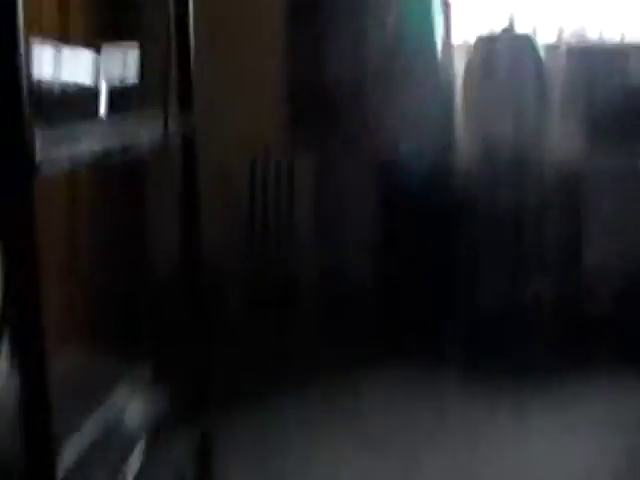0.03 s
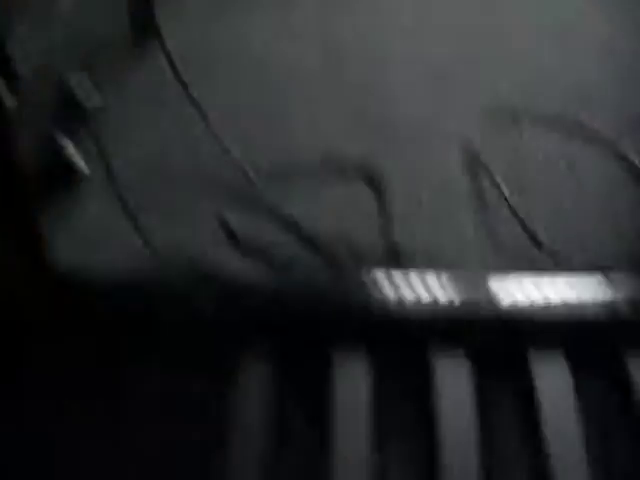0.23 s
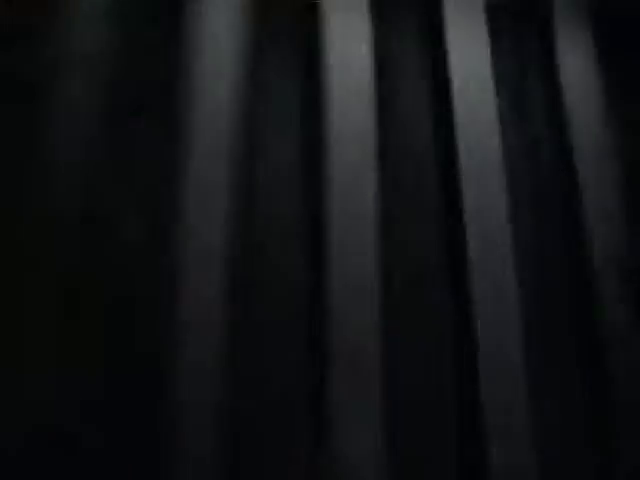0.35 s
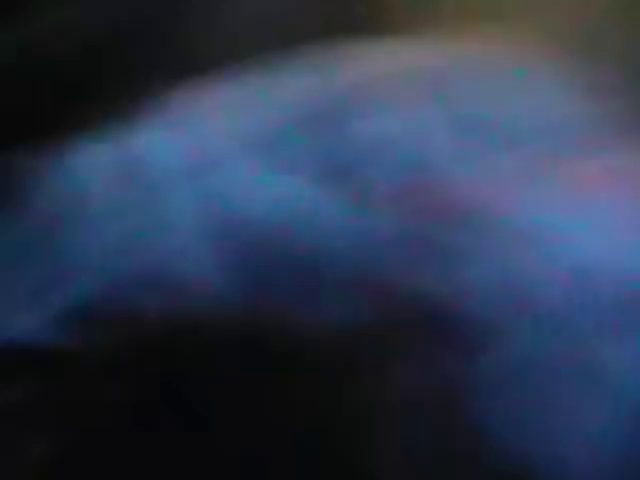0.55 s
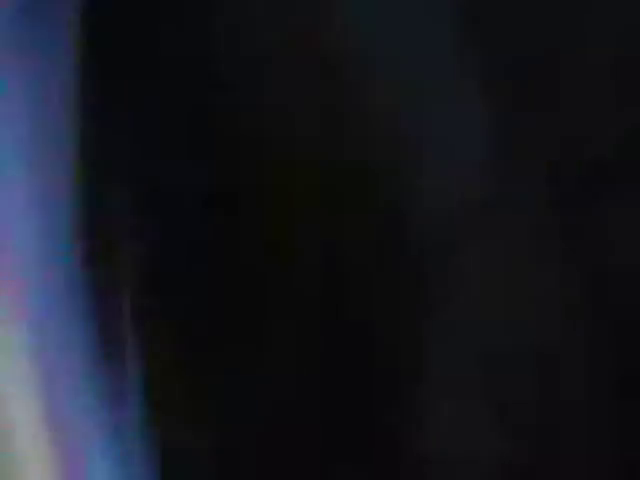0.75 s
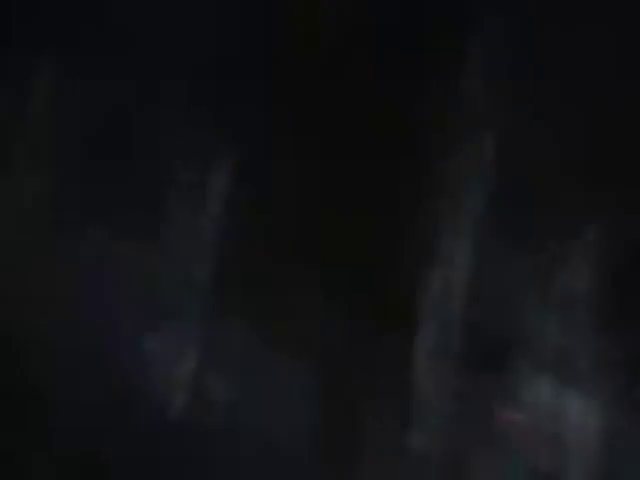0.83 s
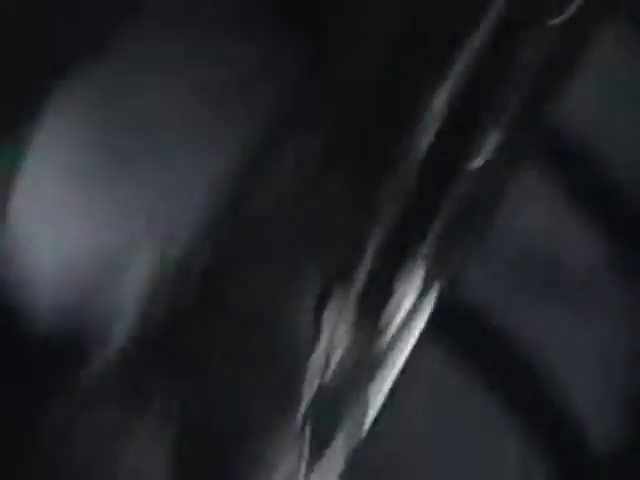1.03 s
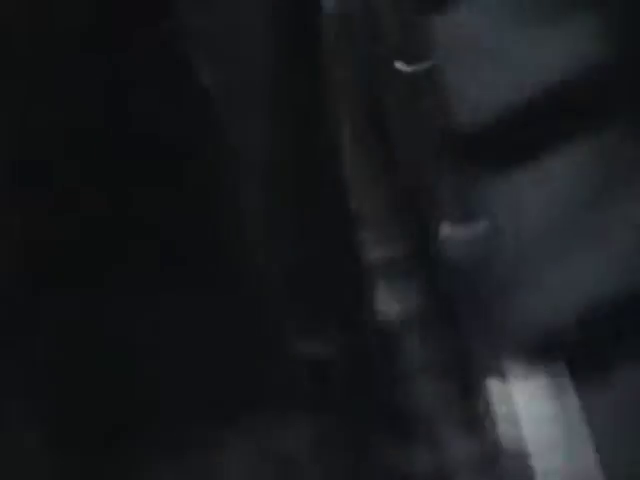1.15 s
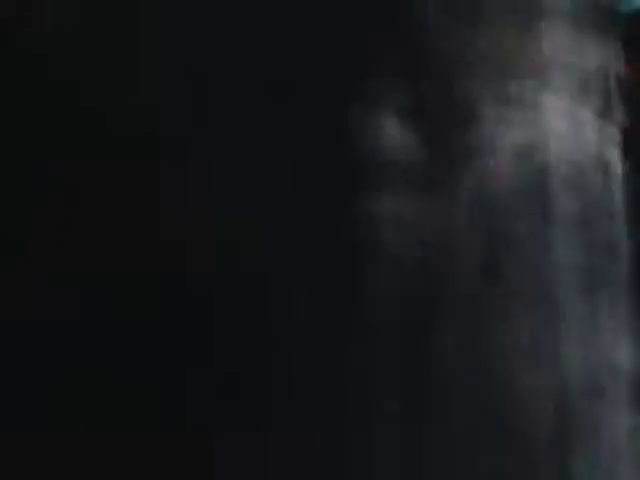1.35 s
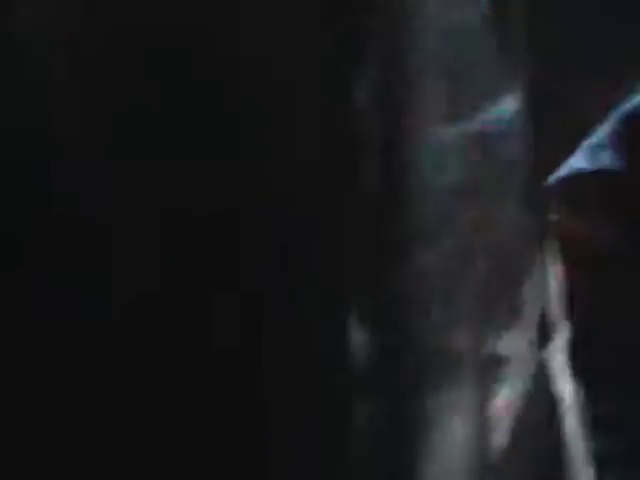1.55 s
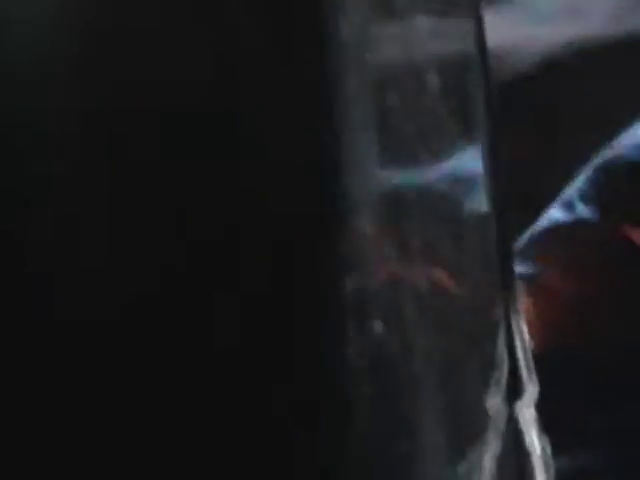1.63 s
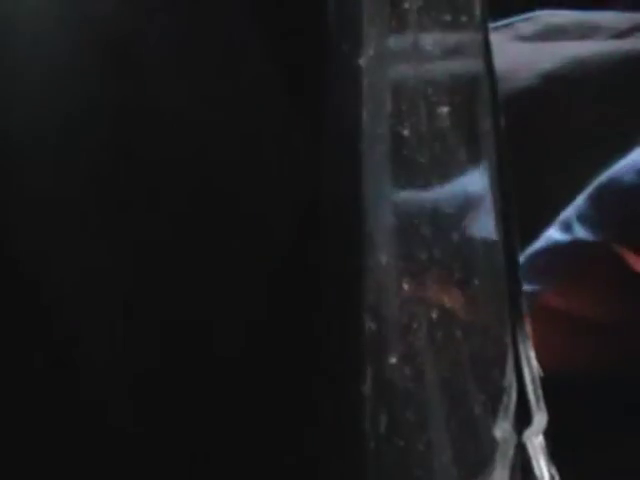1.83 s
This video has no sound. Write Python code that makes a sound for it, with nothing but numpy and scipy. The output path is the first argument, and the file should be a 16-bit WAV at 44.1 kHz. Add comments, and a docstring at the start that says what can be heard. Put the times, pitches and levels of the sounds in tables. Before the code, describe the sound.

A small camera tumbles down with sharp plastic knocks, hollow thumps and scrapes.

```python
"""A small camera slides off its perch, catches an edge, drops and tumbles over things in a quiet room.
Its own two microphones hear it through the casing: each knock is a crack, a hollow clack and a low
thump, with scrapes and one rising rasp in between. The hardest blows overload the input.
Once the camera has reached the floor, the room answers with a short echo."""
import sys
import numpy as np
from scipy import signal
from scipy.fft import rfft, irfft
from scipy.io import wavfile

SR = 44100
rng = np.random.default_rng(int(sys.argv[2]) if len(sys.argv) > 2 else 0)


def transcribe(u):
    """Save the signal u as a 16-bit wav file named by the first command-line argument.

    u: samples, shape (n,) or (channels, n), limited to [-1, 1]; the rate is SR.
    q: integer samples, one column per channel.
    """
    v = np.clip(np.atleast_2d(u).T, -1, 1)
    q = np.round(v * 32767).astype(np.int16)
    wavfile.write(sys.argv[1], SR, q)


N = 83790
T = np.arange(N) / SR
HIT_T = T[:8192]  # seconds since a hit began


def knocks():
    """Every blow and tap of the tumble; some hit hard objects that answer with a dry note."""
    # blows (time [s], crack [dB], clack [dB], thump [dB], thump pitch [Hz], chatter fade time [ms])
    blows = [(0.2346, -42, -14, -7.5, 130.6, 2.7), (0.367, -52, -11, -8, 164, 3),
             (0.384, -13.5, 0.5, -4, 135, 3.1), (0.4146, -19, 1, -0.5, 124, 3.6),
             (0.435, -7, -3.5, -15, 127, 5.9), (0.5277, 6.5, 9.5, 3, 149, 3.3),
             (0.533, 1.5, 1.5, 7.5, 240, 11), (.546, -4, 3, 5, 165, 0.63), (0.551, 12, 3, 4.5, 226, 1.27),
             (0.5571, -1, 8, 5.5, 240, 2.1), (0.5779, -8.5, -14, -7.5, 249, 2.5),
             (0.599, -1.5, 2.5, -19.5, 170, 4.2), (.634, -10.5, -10, -19, 168, 0.48),
             (.676, -8.5, -11, -13, 267, 8.1), (0.712, -8.5, -10.5, -10, 215, 2.5),
             (0.743, -12, -7.5, -14, 128.6, 2.2), (0.7711, -9, -1.5, -4.5, 212, 0.63),
             (0.8835, 6.5, 7, 3, 302, 2.5), (.892, -3.5, -0.5, -2.5, 173, 2),
             (0.91, -7, -5.5, -9, 141, 1.8), (0.928, -10, -4.5, -5.5, 246, 6.6),
             (0.9355, -2, 6, -6.5, 261, 3.8), (1.056, -33, -14.5, -14.5, 199, 0.93),
             (1.1347, -11.5, -16.5, -7, 216, 0.2), (1.153, -8.5, -8, -3, 202, 2.6),
             (1.158, -16.5, 3.5, 1.5, 207, 3.3), (1.212, 0.5, 7.5, -0.5, 227, 3.2),
             (1.218, -13.5, -6, -8, 182, 1.9), (1.2417, -15, -4.5, -5, 151, 2.3),
             (1.2849, -15, -6.5, 1.5, 356, 2.8), (1.3815, 1.5, 0, -17, 217, 2.6),
             (1.388, -27, -26, -2.5, 227.5, 3), (1.41, -3.5, -9, -8, 250, 5),
             (1.425, -12.5, -8, -11.5, 139, 4.3), (1.483, -12.5, -11.5, -9, 203, 3),
             (1.5849, -16.5, -16, -9.5, 146, 3.3), (1.598, -19, -15.5, -19.5, 163, 0.18),
             (1.634, -22.5, -20.5, -12.5, 186, 2), (1.644, -25, -19.5, -18, 109, 7.4),
             (1.747, -61, -42, -31, 103.8, 3.6)]
    # light taps of a corner (time [s], level [dB])
    taps = [(0.6146, -20.5), (0.6516, -23.5), (0.6924, -16), (0.72, -19.5), (0.759, -21), (.784, -18.5),
            (0.829, -22.5), (0.853, -33), (0.951, -16), (1.010, -31), (1.0929, -32), (1.404, -14.5),
            (1.464, -12)]
    # hard objects struck on the way (time [s], pitch [Hz], level [dB])
    objects = [(.393, 2270, -4), (0.578, 3320, -10.5), (0.7121, 1580, -10), (.721, 2595, -12.5),
               (.886, 886, 1), (0.936, 2150, -3.5), (1.156, 2410, -4), (1.212, 643, -2), (1.382, 745, -9),
               (1.4264, 2080, -11.5), (1.586, 615, -15), (1.598, 700, -21.5)]
    out = np.zeros((2, N))
    for at, crack_db, clack_db, thump_db, hz, chatter_ms in blows:
        blow = undb(crack_db) * crack(chatter_ms) + undb(clack_db) * clack() - undb(thump_db) * thump(hz)
        add(out, at, blow)
    for at, db in taps:
        add(out, at, undb(db) * (crack(chatter_ms=0.66) + undb(6.5) * clack()))
    for at, hz, db in objects:
        contact = pair(grains(len(HIT_T), spread_db=0.84), apart=0.22) * fade(seconds=0.023)
        note = signal.lfilter(*signal.iirpeak(hz, Q=11.7, fs=SR), contact)
        add(out, at, undb(db) * burst(note))
    return out


def crack(chatter_ms, snap=1.98, tail_s=0.01):
    """A hard snap, then loose parts chatter and ring."""
    # tone of a crack (frequency [Hz], level [dB])
    tone = [(100, -5), (600, 1), (1500, 4.5), (3000, -1.5), (7500, -5.5), (11000, -19.5), (16000, -32)]
    # notes of small plastic parts (pitch [Hz], level [dB])
    parts = [(2070, -8.5), (2600, 0.5), (3560, -9.5), (4150, 2.5)]
    chatter = np.exp(-HIT_T * 1000 / max(chatter_ms, 0.3))
    tail = undb(-24) * np.exp(-HIT_T / tail_s)
    contacts = grains(len(HIT_T), spread_db=6.5) * (chatter + tail)
    contacts[0, 0] += snap
    contacts[1, 4] += snap
    ringing = ring(parts, fade_s=0.031, spread_db=4, apart=0.41)
    return burst(colour(pair(contacts, apart=0.32), tone)) + undb(-11.5) * ringing


def clack():
    """The hollow casing rings briefly when struck."""
    # notes of the casing (pitch [Hz], level [dB])
    casing = [(335, 5), (430, 2), (520, 5), (640, 5.5), (850, 3.5), (1000, 0), (1320, -5.5)]
    return ring(casing, fade_s=0.04, spread_db=3, apart=0.54)


def thump(hz, swell_s=0.0014, swings=1.94):
    """The camera rebounds on what it hit for a few swings, until contact breaks."""
    contact = (1 - np.exp(-HIT_T / swell_s)) * np.exp(-(hz * HIT_T / swings) ** 2)
    swing = np.sin(2 * np.pi * hz * HIT_T) * contact
    rock = np.sin(2 * np.pi * 1.33 * hz * HIT_T) * contact
    return pair([swing, rng.choice([-1, 1]) * rock], apart=0.33)


def ring(notes, fade_s, spread_db, apart):
    """Each hit lands on a new spot, so its notes vary in strength and pitch; high ones die sooner."""
    out = 0
    for hz, db in notes:
        strength, detune, split, side = rng.standard_normal(4)
        mic_shift = apart * split * np.array([[1], [-1]])  # the microphones are out of step
        phase = 2 * np.pi * hz * (1 + 0.04 * detune) * HIT_T + mic_shift
        gain = np.sign(side) * undb(db + spread_db * strength)
        out = out + gain * np.sin(phase) * fade(fade_s * np.sqrt(notes[0][0] / hz))
    return burst(out)


def rasp(width_hz=150):
    """An edge scrapes faster and faster over a ribbed surface: a rough rising note with hiss."""
    # course of the scrape (time [s], pitch [Hz], level [dB])
    scrape = [(1.317, 456, -29), (1.33, 562, -23.5), (1.35, 645, -19), (1.365, 757, -15), (1.381, 759, -21),
              (1.392, 790, -31.5)]
    # tone of its hiss (frequency [Hz], level [dB])
    tone = [(200, -54.5), (1200, -1.5), (4000, -5.5), (10000, -19.5), (16000, -36)]
    smoothing = signal.butter(2, width_hz / 2, fs=SR, output="sos")
    wobble = signal.sosfilt(smoothing, rng.standard_normal((2, 2, N)))
    phase = 2 * np.pi * np.cumsum(curve(scrape)) / SR
    note = unit(pair(wobble[0] * np.sin(phase) + wobble[1] * np.cos(phase), apart=0.39))
    grit = pair(grains(N, spread_db=2.1), apart=0.68)
    hiss = unit(colour(grit * (1 + 0.5 * np.cos(phase)), tone))  # one pulse for each rib
    touching = (T > scrape[0][0]) & (T < scrape[-1][0])
    return (note + undb(-5) * hiss) * undb(curve(scrape, column=2)) * touching


def drag():
    """The casing drags over things between the blows, catching and slipping with a gritty sound."""
    # strength of the rubbing (time [s], level [dB])
    loudness = [(0, -82), (.21, -33.5), (.28, -21), (.35, -42), (.392, -4.5), (.44, -21), (.505, -55),
                (.6, -24.5), (.73, -19.5), (.87, -44), (.95, -23), (1.02, -40), (1.3, -40), (1.42, -20.5),
                (1.5, -42), (1.6, -31.5), (1.72, -56)]
    # its dull tone (frequency [Hz], level [dB])
    tone = [(60, -17.5), (200, 10.5), (2500, -13.5), (16000, -35)]
    grit = pair(grains(N, spread_db=2.5), apart=0.59)
    return unit(colour(grit, tone)) * undb(curve(loudness))


def slide():
    """The slipping casing hisses; the middle pitches push the two microphones opposite ways."""
    # strength of the first slide (time [s], level [dB])
    loudness = [(0, -33), (.18, -32), (.375, -22), (.44, -21), (.492, -41.5), (.52, -79)]
    # tone of the hiss (frequency [Hz], level [dB])
    tone = [(40, -12.5), (150, 3), (850, -2.5), (5500, -11), (8000, -9.5), (11000, -15), (16000, -20)]
    # extra shaping of the opposite part (frequency [Hz], level [dB])
    opposite_tone = [(100, -3.0), (1000, 6.5), (6800, -8.0), (14000, 1.5)]
    common, opposite = colour(grains(N, spread_db=2.34), tone)
    hiss = pair([common, colour(opposite, opposite_tone)], apart=0.96)
    return unit(hiss) * undb(curve(loudness))


def twist(x, flex_hz=1040):
    """Glancing contact bends the casing and pushes the microphones opposite ways; treble passes by."""
    # sideways bending: strong while an edge rubs, weak in square blows (time [s], level [dB])
    bending = [(.45, 5), (.6, -4.5), (.68, -11), (1.13, -8), (1.22, 0), (1.385, -5.5), (1.41, 9.5),
               (1.49, 2.5), (1.58, -4.5)]
    common, opposite = (x[0] + x[1]) / 2, (x[0] - x[1]) / 2
    lows = signal.sosfilt(signal.butter(1, 2 * flex_hz, fs=SR, output="sos"), opposite)
    flex = lows + signal.lfilter(*signal.iirpeak(flex_hz, Q=1, fs=SR), opposite)
    opposite = opposite - lows + undb(curve(bending)) * flex
    return np.array([common + opposite, common - opposite])


def room(x, swell_s=0.008):
    """Short echo of a furnished room; each range of pitch fades at its own speed."""
    # the echo (frequency [Hz], level [dB], time to fade by 60 dB [s])
    bands = [(69, -0.5, 0.34), (224, -11.5, 0.29), (510, -15.5, 0.2), (1195, -20.5, 0.19),
             (4970, -23.5, 0.4), (14000, -41.5, 0.13)]
    t = T[:N // 2]
    noise = rfft(pair(rng.standard_normal((2, len(t))), apart=0.45))
    log_hz = np.log(np.fft.rfftfreq(len(t), 1 / SR) + 1)
    log_centres = np.log(np.array(bands)[:, 0])
    echo = 0
    for share, (_, db, fade_s) in zip(np.eye(len(bands)), bands):
        band = irfft(noise * np.interp(log_hz, log_centres, share), len(t))
        envelope = np.exp(-np.log(1000) * t / fade_s) * (1 - np.exp(-t / swell_s))
        echo = echo + undb(db) * band * envelope / np.linalg.norm(envelope)
    return signal.fftconvolve(x, echo, axes=1)[:, :N]


def background():
    """A faint, steady rumble with a little hiss."""
    # tone of the quiet room (frequency [Hz], level [dB])
    tone = [(30, -12), (90, 8), (500, -28.5), (7500, -21), (16000, -42.5)]
    return undb(-54) * unit(colour(pair(rng.standard_normal((2, N)), apart=0.17), tone))


def grains(size, spread_db):
    """Two streams of tiny contacts whose strength changes every 16 samples."""
    noise = rng.standard_normal((2, size))
    strength = np.repeat(rng.standard_normal(size // 16 + 1), 16)[:size]
    return unit(noise * undb(spread_db * strength))


def pair(x, apart):
    """Both microphones share x[0]; x[1] reaches them with opposite signs, scaled by apart."""
    return np.array([x[0] + apart * x[1], x[0] - apart * x[1]]) / np.hypot(1, apart)


def colour(x, points):
    """Shape the tone of a sound along points of (frequency [Hz], level [dB])."""
    size = 2 * x.shape[-1]
    hz, db = np.array(points).T
    log_hz = np.log(np.fft.rfftfreq(size, 1 / SR) + 1)
    log_filter = irfft(np.log(undb(np.interp(log_hz, np.log(hz), db))))
    # fold the filter forward in time, so nothing sounds ahead of a hit
    log_filter[1:size // 2] *= 2
    log_filter[size // 2 + 1:] = 0
    return irfft(rfft(x, size) * np.exp(rfft(log_filter)))[..., :size // 2]


def fade(seconds):
    """A struck part dies away by 60 dB in this time."""
    return np.exp(-np.log(1000) * HIT_T / seconds)


def curve(rows, column=1):
    """One column of a table, joined by straight lines in time."""
    rows = np.array(rows)
    return np.interp(T, rows[:, 0], rows[:, column])


def undb(db):
    """Turn decibels into a multiplier."""
    return 10 ** (np.asarray(db) / 20)


def unit(x):
    """Scale to an average power of 1."""
    return x / np.sqrt(np.mean(x ** 2))


def burst(x):
    """Scale to the energy of one millisecond at full level."""
    return x / np.sqrt(np.mean(np.sum(x ** 2, axis=-1)) * 1000 / SR)


def add(out, at, x):
    """Mix a sound in at a time in seconds."""
    start = int(at * SR)
    out[:, start:start + x.shape[1]] += x[:, :N - start]


def scene(landing_s=0.52):
    """Tumble, slide and room; only the knocks and the rasp after the landing set off the echo."""
    blows = knocks() + rasp()
    quiet = background()
    return twist(blows + drag()) + room(blows * (T > landing_s)) + slide() + quiet


def record(dry, ceiling=0.75, hardness=18, low_hz=30, top_hz=15900):
    """The input overloads on hard blows, then cuts the deepest rumble and the highest treble."""
    x = dry / (1 + np.abs(dry / ceiling) ** hardness) ** (1 / hardness)
    x = signal.sosfilt(signal.butter(2, low_hz, "high", fs=SR, output="sos"), x)
    return signal.sosfilt(signal.ellip(8, 0.2, 70, top_hz, fs=SR, output="sos"), x)


dry = scene()
out = record(dry)
transcribe(out)
```